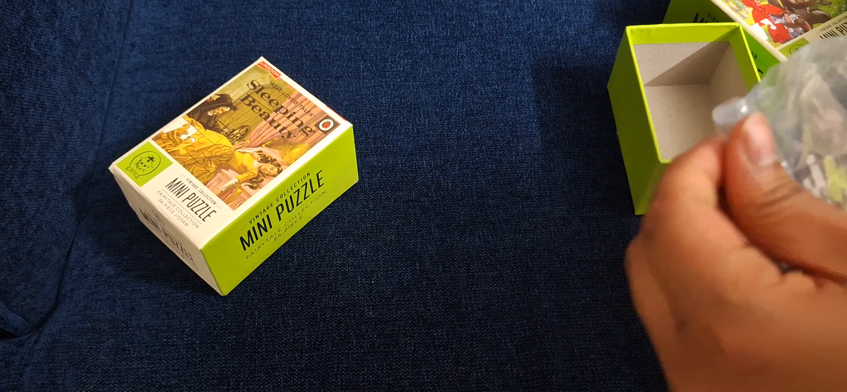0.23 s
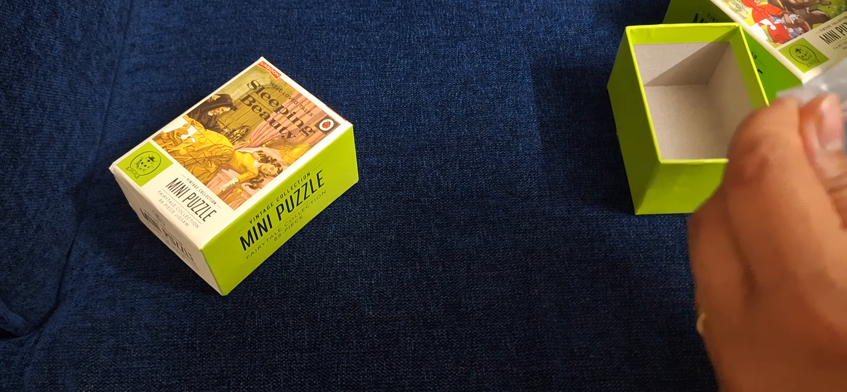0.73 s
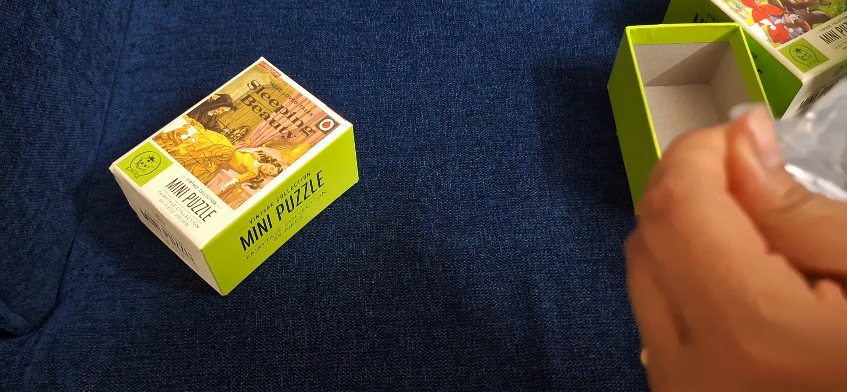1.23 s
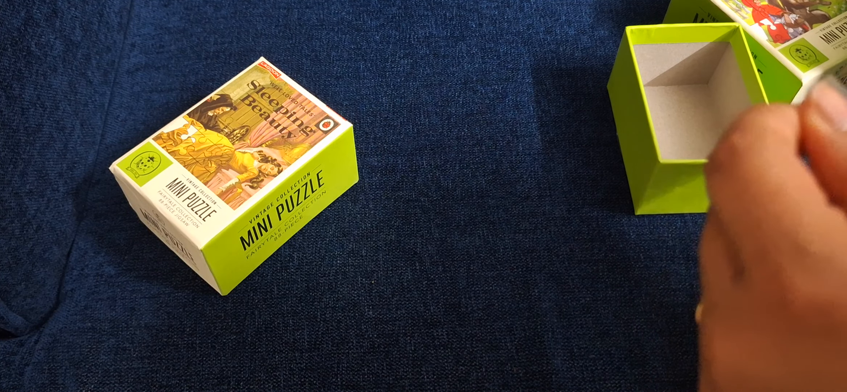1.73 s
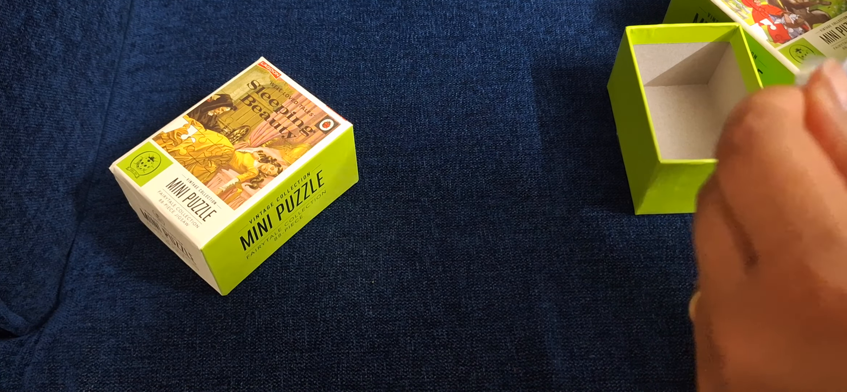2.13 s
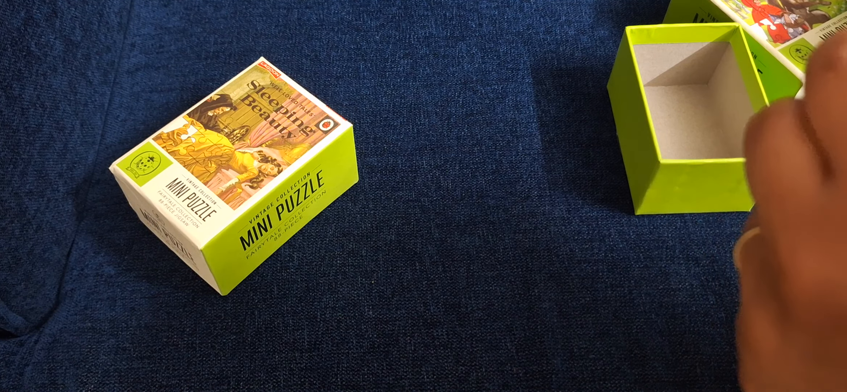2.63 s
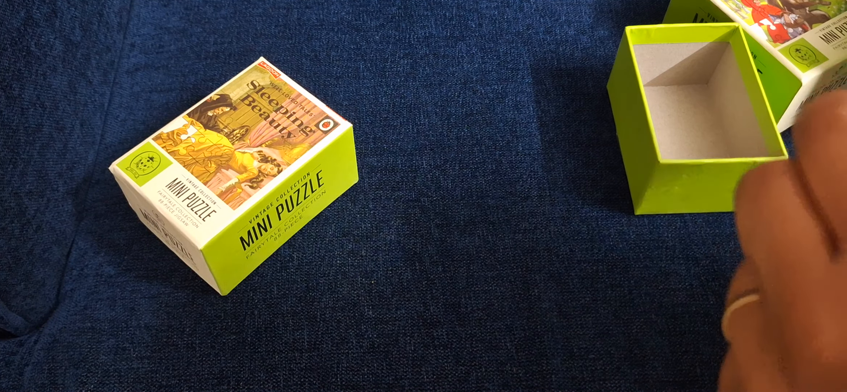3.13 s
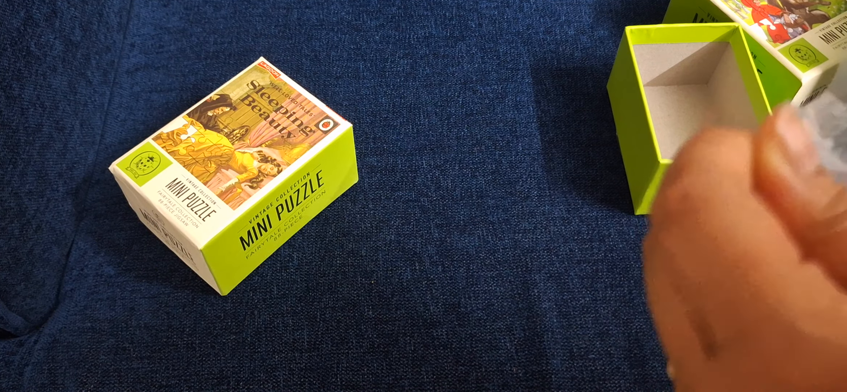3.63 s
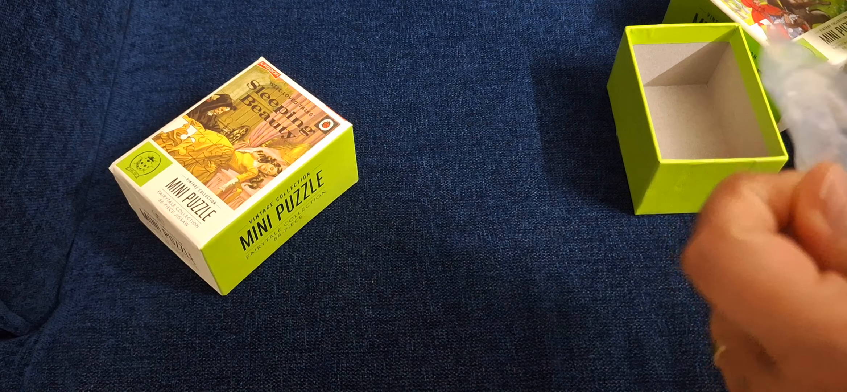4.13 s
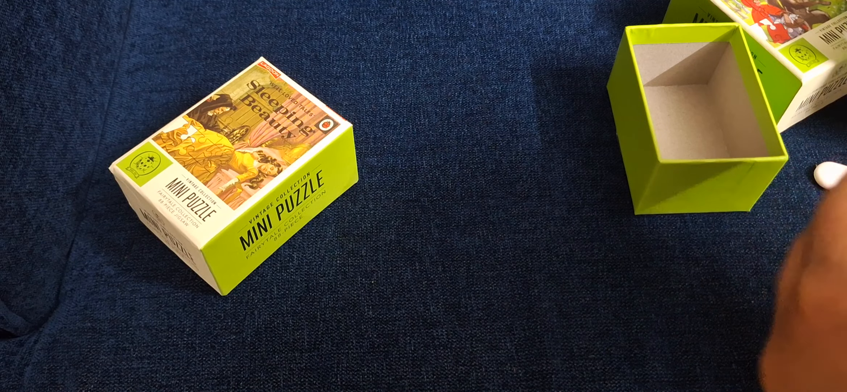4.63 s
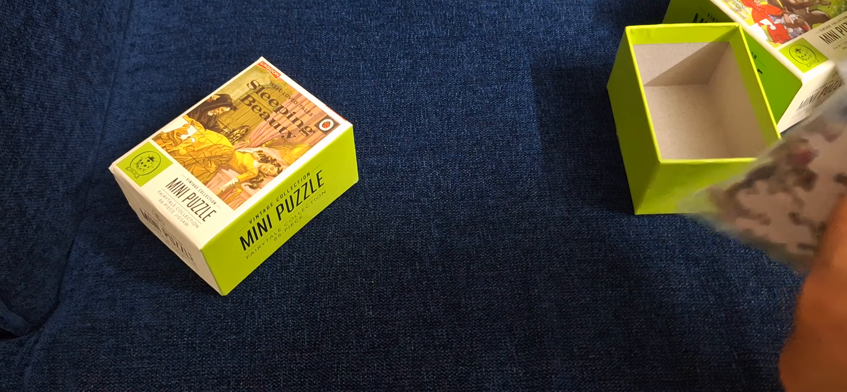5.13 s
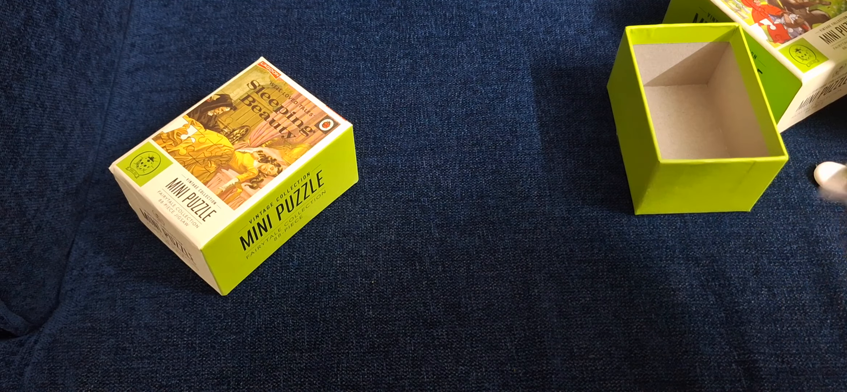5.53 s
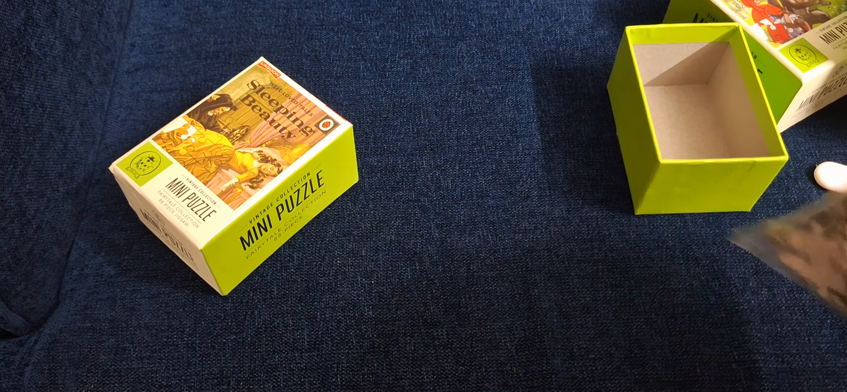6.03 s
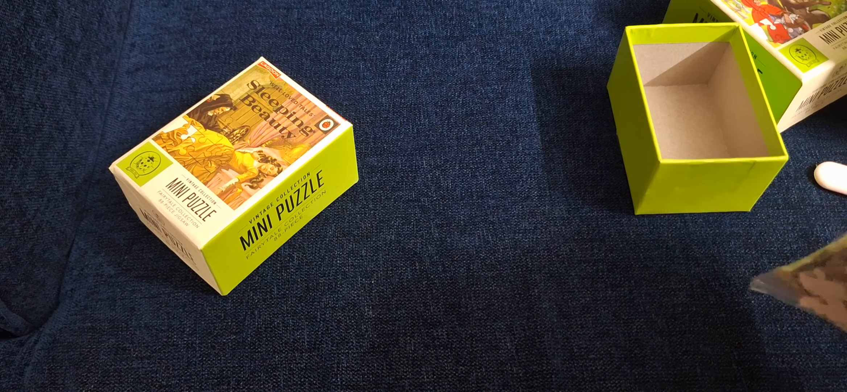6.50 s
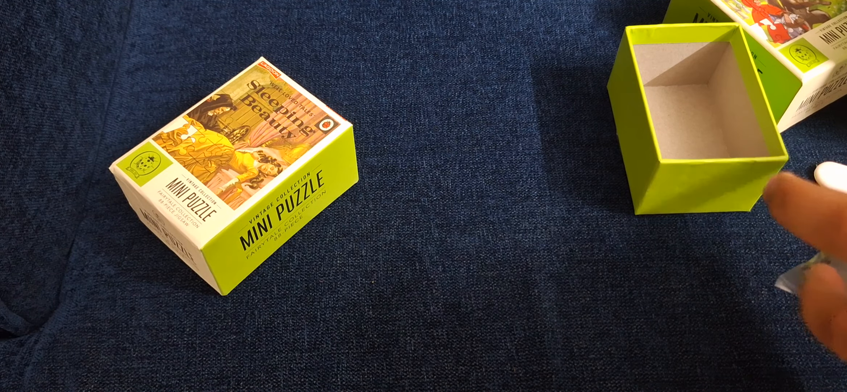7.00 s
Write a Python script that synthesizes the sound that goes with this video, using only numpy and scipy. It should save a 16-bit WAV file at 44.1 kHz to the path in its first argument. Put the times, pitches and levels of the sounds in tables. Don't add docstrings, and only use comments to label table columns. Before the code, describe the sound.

A small plastic bag of cardboard pieces is handled very close to a stereo phone in a small furnished room. It starts quietly, with faint ticks over a low, steady appliance hum. From 0.7 to 1.4 s sharp dry snaps and dense rustle build up, ending in a short smooth hissing slide around 1.5 s. A tight bright cluster cracks at about 1.9 s, then sparse ticks and another burst near 2.6 s. The loudest moment comes at 3.1 to 3.3 s: hard crackling with a low thump and hollow knock. From 3.4 to 4.1 s it is nearly silent. Crackle returns at 4.4 s, strengthens at 5.1 s and peaks around 5.45 s with card ticks and a knock. Until 6.8 s the shaking is looser and duller, thinning out; one last crinkle comes near 7.15 s. The bag moves from slightly right towards left; reverb is short and soft.

```python
import sys
import numpy as np
from scipy import signal
from scipy.fft import rfft, irfft, next_fast_len
from scipy.io import wavfile
from scipy.ndimage import uniform_filter1d

SR = 44100
rng = np.random.default_rng(int(sys.argv[2]) if len(sys.argv) > 2 else 0)


def int16_out(signal):
    q = np.round(np.clip(np.atleast_2d(signal).T, -1, 1) * 32767)
    wavfile.write(sys.argv[1], SR, q.astype(np.int16))


def how_loud(loudness_db):
    steps = np.asarray(loudness_db, float) / 20
    return 10 ** steps


N = 320166
T = np.arange(N) / SR
PORT_LAG, BASS_LAG, SLIDE_LAG = 8, 14, 15

# t/s, level/dB
HUM_LEVEL = [(0.0, -64.5), (1.05, -59.5), (4.14, -65), (4.65, -60), (7.26, -62.5)]
# f/Hz, level/dB
AIR_SPECTRUM = [(15, -44), (25, -25.5), (90, -9.5), (124, -12), (150, -15.5), (296, -25.5), (330, -21.5),
                (809, -36.5), (927, -48.5), (7710, -47.5), (16500, -53.5)]
# f/Hz, level/dB
FILM_SPECTRUM = [(88, -35), (150, -7.5), (583, -10.5), (1230, -12), (1500, -11.5), (4690, -17),
                 (6810, -19.5), (15000, -27), (16500, -33.5)]
# t/s, left minus right level/dB
BAG_PAN = [(0.0, -3.5), (1.4, -5), (2.6, -3), (3.3, -3), (3.78, -0.5), (4.8, -3), (5.4, -.5), (6.2, 1),
           (6.7, 4), (7.26, 3)]
# full grip t/s, held t/s, effort level/dB, brightness/dB (bare film above 0, card below)
HAND_MOVES = [(0.038, 0.026, -57, -0.5), (0.13, 0.081, -64, -1), (0.693, 0.022, -47, -0.5),
              (0.8, 0.12, -59, 0), (0.989, 0.17, -43, -1), (1.329, 0.05, -49, -0.5), (1.409, 0.1, -41.5, 2),
              (1.773, 0.08, -52, -5.5), (2.05, 0.0049, -56, 2.5), (2.24, 0.0056, -75, 0),
              (2.411, 0.065, -62, -0.5), (2.561, 0.092, -56.5, 1.5), (2.84, 0.0092, -54, 0),
              (3.019, 0.12, -68, -0.5), (3.195, 0.052, -34, 2), (3.72, 0.12, -80, 11.5),
              (4.059, 0.0307, -63.5, 2), (4.131, 0.043, -50.5, -1), (4.272, 0.088, -69, -1.5),
              (4.429, 0.034, -42.5, 0.5), (4.55, 0.3, -54.5, 0), (5.045, 0.07, -43, 2),
              (5.169, 0.11, -54.5, 1), (5.428, 0.051, -36.5, 0.5), (5.58, 0.27, -56, 0),
              (5.93, 0.28, -53, -0.5), (6.26, 0.025, -56.5, 0.5), (6.363, 0.025, -48.5, 1.5),
              (6.604, 0.082, -57, 0.5), (6.761, 0.094, -68, -3.5), (7.165, 0.017, -53.5, 0)]

# t/s, peak level/dB, film ring f/Hz, fizz level/dB
PICKING_SNAPS = [(0.0321, -39, 7660, -34), (0.1669, -39, 5130, -3), (0.2148, -37.5, 7500, 5),
                 (0.4294, -37, 4870, -34), (0.6695, -39, 1700, -22), (0.6773, -39, 6600, 4),
                 (0.7518, -15.5, 5050, -7.5), (0.8144, -22.5, 6240, -1), (0.8689, -23.5, 6500, -19),
                 (0.958, -23, 5040, -19.5), (0.9932, -23.5, 3150, -1), (1.022, -21.5, 1210, -7.5),
                 (1.0645, -17, 5130, 1), (1.0924, -28, 3120, 8), (1.1577, -16, 5270, -14),
                 (1.3222, -28.5, 2350, -12), (1.8394, -24, 4300, -34), (1.8589, -22, 5300, -10),
                 (1.8777, -17, 3150, -10.5), (1.8978, -10, 5320, -7.5), (2.1395, -36, 4560, -26),
                 (2.328, -45, 2980, -33), (2.4388, -33.5, 3050, -47), (2.4771, -34.5, 4830, -25),
                 (2.5494, -28, 4370, -19), (2.5571, -31, 4030, -10.5), (2.5733, -31, 1290, 0),
                 (2.5854, -15.5, 4570, 3), (2.6602, -29, 2195, -1.5)]
# t/s, peak level/dB, film ring f/Hz, fizz level/dB
TEARING_SNAPS = [(2.805, -32.5, 4650, -14), (2.838, -30.5, 6900, -11), (3.0823, -33, 2770, -3),
                 (3.1134, -28, 2900, -7), (3.1313, -16, 3640, -10), (3.1413, -15.5, 6000, -1.5),
                 (3.185, -16, 5700, -0.5), (3.237, -9.5, 2020, -9), (3.294, -9.5, 2196, -6.5),
                 (3.3723, -31.5, 1340, -6), (3.603, -44.5, 2170, -34), (3.7104, -53, 8100, 18),
                 (4.1298, -29.5, 3860, -32), (4.1495, -37, 3530, -19), (4.224, -32.5, 8150, 1),
                 (4.5246, -32, 4200, -14), (4.536, -35, 3140, -2), (4.561, -23.5, 2900, -8.5),
                 (4.5952, -20.5, 3180, -9.5), (4.632, -28.5, 8000, -30), (4.661, -32.5, 3120, -9),
                 (4.8018, -31.5, 5740, -30), (4.8204, -23.5, 2330, -2), (4.9633, -34.5, 1430, -22),
                 (4.9852, -29.5, 6250, 5), (5.0693, -19.5, 6370, -5), (5.1002, -14.5, 6860, -3.5)]
# t/s, peak level/dB, film ring f/Hz, fizz level/dB
SHAKING_SNAPS = [(5.2418, -46, 4100, -24), (5.256, -25, 5340, -7), (5.3365, -35.5, 3800, -28),
                 (5.3943, -30, 6000, -5), (5.412, -35, 5170, 7), (5.4453, -26.5, 1190, 6),
                 (5.53, -23.5, 6000, -4), (5.5894, -30.5, 6800, -14), (5.65, -23.5, 7600, -7.5),
                 (5.7409, -34.5, 1870, -22), (5.7711, -28, 1670, -11), (5.808, -28.5, 2030, -30),
                 (5.8234, -23.5, 1630, -21), (5.9417, -25.5, 2490, -24), (6.0025, -57, 1620, -18),
                 (6.02, -45, 3150, -15), (6.0519, -27.5, 1050, -5.5), (6.152, -25.5, 6760, -21),
                 (6.231, -27, 2204, -4.5), (6.3664, -28, 1840, -11), (6.659, -29, 1860, -30),
                 (6.8033, -37, 1510, -36), (7.128, -54, 2990, -31), (7.155, -23.5, 2700, -10)]
# t/s, peak level/dB, film ring
# f/Hz, fizz level/dB
FURTHER_SNAPS = [(0.1139, -49.5, 1130, 8), (1.8442, -27, 4200, -4), (3.0805, -44, 1500, -11),
                 (3.1845, -22.5, 1990, -13), (3.2635, -17, 1250, -4.5), (3.31, -20.5, 3070, -25.5),
                 (3.7098, -42, 4200, 15), (3.7793, -55.5, 3820, -6), (3.8683, -60.5, 8400, -12.5),
                 (4.4162, -36, 7130, -11), (4.4458, -21, 4600, -16), (5.0578, -32, 2050, -21.5),
                 (6.61, -34, 3200, 1), (6.617, -38, 8200, 4),
                 (0.954, -33, 4000, -25), (1.0446, -23.5, 3480, -10), (1.142, -37, 2480, -13),
                  (1.18, -29, 3500, -25), (1.788, -33, 3500, -17), (4.409, -43, 6000, -17),
                  (4.476, -24.5, 2460, -21), (4.5268, -32, 4830, -12), (4.569, -33, 5500, -11),
                  (4.578, -38, 5440, -6), (4.758, -47, 1990, -7), (4.809, -35, 3500, -14),
                  (4.871, -39, 3000, -18), (5.005, -44, 4000, -7), (5.033, -39, 4000, -16),
                  (5.645, -46, 7500, 3), (5.673, -31, 7000, -14), (6.263, -34, 2400, -26),
                  (6.400, -31, 2000, -8), (6.579, -44, 2480, -18), (6.699, -46, 2000, -22),
                  (6.725, -60, 3000, -25), (3.808, -59, 7700, 2), (3.842, -57, 7560, 0),
                  (3.243, -30, 2480, 3), (1.8955, -24, 5500, -8)]
# t/s, peak level/dB, ring f/Hz
SMALL_TICKS = [(0.057, -48, 6600), (0.3336, -48, 1770), (0.6905, -22.5, 2700), (0.6992, -20, 5960),
               (0.8263, -35.5, 1775), (1.031, -22.5, 5100), (1.049, -24, 5030), (1.1242, -24, 5900),
               (1.1928, -35, 4450), (1.2081, -28, 3260), (1.2442, -35, 2930), (1.263, -34.5, 1580),
               (1.378, -36, 1910), (1.3898, -28, 1880), (1.5836, -33, 4500), (1.7317, -42, 1490),
               (1.793, -29, 5880), (2.4279, -36.5, 1285), (2.5955, -18, 3130), (2.613, -27.5, 3000),
               (3.0119, -36, 3000), (3.0334, -37.5, 1636), (3.149, -16.5, 1950), (3.1973, -21.5, 1960),
               (3.2602, -14, 1920), (3.806, -48.5, 4070), (3.8392, -57, 4370), (4.041, -45, 1940),
               (4.4124, -32, 4100), (4.4566, -22.5, 6950),
               (4.4916, -26, 4540), (4.6891, -26.5, 2700), (4.734, -35, 6200), (5.0413, -28, 5070),
              (5.056, -23.5, 2080), (5.1211, -27, 5960), (5.144, -26, 4120), (5.1534, -29, 5630),
              (5.2606, -42, 5700), (5.302, -36, 2800), (5.423, -23, 7440), (5.4343, -21.5, 4600),
              (5.4682, -25, 5170), (5.478, -19, 4370), (5.5426, -23, 3400), (5.594, -28, 2300),
              (5.6776, -26, 7000), (6.089, -34, 1670), (6.329, -32.5, 1570), (6.3444, -34, 1390),
              (6.375, -31.5, 1740), (6.3871, -27.5, 1940), (6.435, -36, 2850), (6.4542, -35, 2130),
              (6.5836, -32.5, 2960), (6.614, -27.5, 3320), (6.767, -44, 2450), (6.832, -33, 1760),
              (6.8578, -43, 3130), (6.9099, -43.5, 1610),
               (0.711, -30, 4700), (1.0967, -17, 3180), (1.282, -37, 2220), (1.651, -51, 8000),
                  (1.766, -41, 1760), (2.1613, -46, 1990), (2.389, -43.5, 6200), (2.528, -41, 1480),
                  (2.826, -39.5, 1410), (2.857, -39, 2080), (2.945, -50, 1990), (2.963, -59.5, 2930),
                  (3.0235, -39, 2000), (3.739, -48, 4120), (3.78, -55, 7660), (3.973, -59, 7630),
                  (4.309, -42.5, 1460), (4.3473, -48, 3900), (4.779, -43.5, 1300), (4.864, -33, 2200),
                  (5.2226, -32, 5000), (5.92, -39, 1700), (5.9548, -37, 1630), (6.1983, -36, 2700),
                  (6.313, -37, 1160), (6.52, -43, 1800), (6.7084, -41, 1760),
               (0.0852, -42, 1280), (0.1229, -44, 1250), (0.6272, -53, 1750), (0.9866, -24, 3070),
               (1.2037, -26.5, 1500), (1.2161, -28.5, 1540), (1.3222, -51, 1770), (1.3993, -33, 1270),
               (1.6726, -51.5, 1220), (1.7989, -37, 5060), (1.8027, -39.5, 1660), (1.8553, -31, 5070),
               (1.874, -21, 4730), (2.0402, -42.5, 1380), (2.0496, -43, 5130), (2.239, -46, 1240),
               (2.5619, -28, 2034), (2.8426, -27.5, 2420), (2.9864, -50, 1320), (2.9922, -46, 1450),
               (3.0006, -69.5, 3930), (3.0055, -51.5, 2100), (3.3723, -29.5, 1500), (3.49, -53, 4990),
               (4.1496, -23, 3630), (4.2154, -41.5, 1250), (4.5362, -47, 3200), (4.6015, -26.5, 6500),
               (4.6506, -37, 6310), (4.6833, -28.5, 5630), (4.7075, -31, 2500), (4.8777, -42.5, 2410),
               (4.8817, -45, 6400), (5.0835, -37, 3130), (5.1003, -63, 7500), (5.2317, -46, 5370),
               (5.2424, -37, 4100), (5.2603, -20, 5600), (5.2992, -37, 3960), (5.303, -32, 3130),
               (5.3137, -44, 2020), (5.4332, -23.5, 7600), (5.474, -20.5, 5070), (5.4884, -24, 5140),
               (5.7324, -30, 1990), (5.8573, -38, 1180), (5.9633, -32.5, 1830), (5.9836, -43, 2630),
               (6.0032, -32, 1630), (6.3796, -28, 1710), (6.4556, -37.5, 5240), (6.5548, -51, 1960),
               (6.6082, -38, 3080), (6.6441, -39, 1660), (6.731, -38, 1440), (6.8039, -33.5, 1690)]

# t/s, peak level/dB, f/Hz
CLOTH_THUMPS = [(0.125, -48, 75.6), (1.425, -42, 90), (3.185, -37.5, 66), (3.233, -41.5, 86),
                (4.036, -47.5, 94.2), (4.145, -38, 111), (5.817, -48, 103), (5.962, -47, 101),
                (6.594, -51, 67.3)]
# t/s, peak level/dB, f/Hz
KNOCKS = [(.038, -48.5, 253), (.1, -51, 400), (1.475, -39, 286), (1.51, -41, 220),
          (1.843, -39, 418), (3.257, -27, 457), (5.474, -28, 565), (1.154, -37.5, 272),
          (1.261, -36, 415), (2.044, -41, 230), (2.423, -45, 283), (2.608, -33.5, 463),
          (3.601, -51.5, 323), (4.149, -35.5, 120.2), (5.818, -34.5, 317), (6.655, -42.5, 190),
          (7.172, -42.5, 130.6),
          (0.7114, -44, 320), (0.986, -36.5, 448), (1.0346, -28.5, 606), (1.0468, -31.5, 477),
                (1.0956, -28, 800), (1.1908, -30.5, 470), (1.8541, -33, 470), (2.0736, -40.5, 450),
                (2.1624, -47.5, 425), (2.4491, -46, 430), (2.5853, -40, 350), (2.6742, -47, 510),
                (2.9848, -46, 490), (3.1308, -42.5, 486), (3.1845, -38.5, 480), (3.2931, -25, 495),
                (3.3697, -55, 730), (4.1282, -36.5, 450), (4.7067, -47, 462), (4.7362, -44, 590),
                (6.1399, -42, 780), (6.2288, -48, 685), (6.3424, -34.5, 820)]


def unit(x):
    return x / np.sqrt(np.mean(x ** 2))


def band(x, lo_hz, hi_hz, order=2):
    edges = [lo_hz, min(hi_hz, 0.45 * SR)]
    return signal.sosfilt(signal.butter(order, edges, "bandpass", fs=SR, output="sos"), x)


def colour(x, points):
    hz, db = np.transpose(points)
    size = next_fast_len(N)
    f = np.arange(size // 2 + 1) * SR / size + 1
    gain = how_loud(np.interp(np.log(f), np.log(hz), db))
    return irfft(rfft(x, size) * gain, size)[..., :N]


def ports(near, other, pan_db, alike, lag=PORT_LAG):
    alike = np.clip(alike, 0, 1)
    left = alike * np.roll(near, lag) + np.sqrt(1 - alike ** 2) * other
    return np.array([left * how_loud(pan_db / 2), near * how_loud(-pan_db / 2)])


def heard(part, db, pan_db, alike, lag=PORT_LAG):
    near, other, around = part / np.abs(part).max(axis=1, keepdims=True)
    pair = ports(near, other, pan_db, alike, lag)
    peak = np.sqrt(np.mean(np.abs(pair).max(axis=1) ** 2))
    return how_loud(db) * np.vstack([pair / peak, around])


def add(out, x, s):
    i = int(s * SR)
    out[:, i:i + x.shape[1]] += x[:, :N - i]


def appliance():
    duck = how_loud(np.interp(T, *np.transpose(HUM_LEVEL)))
    noise = rng.standard_normal((5, N))
    hum = np.sqrt(2) * np.sin(2 * np.pi * 100.3 * T) + 0.58 * unit(band(noise[0], 95.7, 108))
    drone = unit(band(noise[1], 55, 75)) + 0.62 * unit(band(noise[2:4], 58, 97))
    bass = band(noise[4], 27, 560, order=1)
    air = colour(noise[2:4] + 4.4 * bass, AIR_SPECTRUM)
    return duck * (hum + drone) * how_loud([[-0.5], [0.5]]) + how_loud(-66.5) * unit(air)


def effort():
    grab_db_s, let_go_db_s, rest_db = 739, 208, -74.5
    s, held, db, bright_db = np.transpose(HAND_MOVES)[:, :, None]
    t = T[::64]
    ramp = grab_db_s * np.maximum(s - t, 0) + let_go_db_s * np.maximum(t - s - np.abs(held), 0)
    power = how_loud(2 * (db - ramp))
    total = power.sum(axis=0) + how_loud(2 * rest_db)
    bright = (power * bright_db).sum(axis=0) / total
    return np.interp(T, t, 10 * np.log10(total)), np.interp(T, t, bright)


def crackle(rate, spread_db, ring_s):
    hit, size = rng.random(N), rng.exponential(size=N)
    slips = (hit < rate / SR) * how_loud(spread_db * np.minimum(size, 2.6))
    puff = signal.lfilter([1], [1, -np.exp(-1 / (ring_s * SR))], slips ** 2) ** 0.5
    return unit(puff * rng.standard_normal((2, N)))


def rustle():
    film_db, bright_db = effort()
    card_db = -57.5 + 0.58 * (film_db + 56) - bright_db
    sheen_db = -63 + 0.88 * (film_db + 54) + 2.3 * bright_db
    edge_db = card_db - 1.5 + 0.2 * np.minimum(film_db + 63.5, 0)
    pan_db = np.interp(T, *np.transpose(BAG_PAN))

    slide = uniform_filter1d(1.0 * (T > 1.4) * (T < 1.58), size=2048)
    edge_db = edge_db - 6 * slide
    grip = (1 - 0.75 * slide) * np.clip((film_db + 82) / 16, 0.2, 1)
    patches = sum(unit(band(crackle(90, 3.5, 0.001), hz / 1.25, hz * 1.25))
                  for hz in (1900, 3000, 4800, 7400))
    fine = crackle(3000, 2.5, 0.0006)
    coarse = unit(patches) + 0.6 * unit(band(crackle(120, 3.5, 0.0008), 300, 7000))
    slips = colour(grip * coarse + (1.48 - grip) * fine, FILM_SPECTRUM)
    card = colour(grip * crackle(220, 3.2, 0.002), FILM_SPECTRUM) + 0.6 * slips

    skin = unit(band(slips, 1400, 11000, order=3))
    film = np.sqrt(1 - slide) * ports(*skin, pan_db, 0.51)
    film += np.sqrt(slide) * ports(*skin, pan_db, 0.55, SLIDE_LAG)
    film *= how_loud(film_db)
    glitter = unit(band(fine + grip * crackle(260, 2.6, 0.0011), 9000, 24000, order=3))
    sheen = how_loud(sheen_db) * ports(*glitter, pan_db - 8.5, 0.18)
    scrape = how_loud(card_db) * ports(*unit(band(card, 200, 964)), pan_db + 0.5, 0.86, BASS_LAG)
    scrape += how_loud(edge_db) * ports(*unit(band(card, 740, 1880)), pan_db + 0.11, 0.8, 11)

    rumble = unit(band(crackle(1800, 2.1, 0.0013), 150, 460))
    drag = how_loud(-50.5) * slide * ports(*rumble, pan_db + 3, 0.81, SLIDE_LAG)
    seam_hz = 5280
    seam = unit(band(fine, seam_hz / 1.2, seam_hz * 0.98))
    drag += how_loud(-56.5) * slide * ports(*seam, pan_db, 0.55, SLIDE_LAG)
    return film + sheen + scrape + drag


def room(x):
    t60_s, fast_t60_s, gap_s = 0.23, 0.1, 0.0053
    t = T[:SR // 2]
    tail = rng.standard_normal((2, len(t))) * how_loud(-60 * t / t60_s) * (t > gap_s)
    tail = band(tail, 95, 9400) + 0.93 * tail * how_loud(-60 * t / fast_t60_s)
    tail /= np.sqrt(np.sum(tail ** 2, axis=1, keepdims=True))
    tail = ports(*tail, -3, 0.4)
    return how_loud(-6) * signal.fftconvolve(x[None], tail, axes=1)[:, :N]


def snaps():
    out, t = np.zeros((3, N)), T[:768]
    fizz_base_db, fizz_db_per_octave = -32, 13
    ticks = [(s, db, hz, fizz_base_db + fizz_db_per_octave * np.log2(hz / 1500))
             for s, db, hz in SMALL_TICKS]
    rows = PICKING_SNAPS + TEARING_SNAPS + SHAKING_SNAPS + ticks + FURTHER_SNAPS

    chance = rng.standard_normal((len(rows), 5, 3, len(t)))
    chance[:, :, 2] = t == 0
    chance[:, 1:3, :2, 10] += 6
    settle = uniform_filter1d(1.0 * (chance[:, 4, :1] > 2.7), size=24) * 24
    onset = 1 - np.exp(-(t + 1 / SR) / 0.0004)
    flips = onset * (np.exp(-t / 0.001) + (0.045 + 0.25 * settle) * np.exp(-t / 0.006))
    fizzes = band(chance[:, 2] * flips, 6500, 16400)

    boom_hz = 690 * 2 ** (0.75 * np.clip(chance[:, 4, 1, 0], -1, 1))
    pushes = chance[:, 3] * np.exp(-t / 0.003)
    wides = band(pushes, 380, 2000)
    booms = [band(push, hz / 0.77, hz * 2.65, order=1) + 2.1 * wide
             for push, hz, wide in zip(pushes, boom_hz, wides)]

    for (s, db, hz, fizz_db), c, flip, fizz, boom in zip(rows, chance, flips, fizzes, booms):
        boom_db = -10 + 2.5 * np.log2(hz / 1500)
        boom_db -= 0.5 * max(fizz_db - fizz_base_db, 0) * (hz > 2200)
        boom_db += 0.83 * min(db + 32, 0)
        pan_db = np.interp(s, *np.transpose(BAG_PAN))
        film = 4.06 * band(c[0] * flip, hz * 0.86, hz * 1.12, order=1)
        film += band(c[1] * flip, 900 + 0.057 * hz, 2300 + 1.1 * hz)
        sound = heard(film, db + 1, pan_db, 0.38 + 0.28 * (hz < 2500))
        sound += heard(boom, db + boom_db + 4.5, pan_db - 1.5, 0.85, BASS_LAG)
        sound += heard(fizz, db + fizz_db + 5.5, pan_db - 21, 0.14)
        sound[2] *= how_loud(-0.2 * (db + 38))
        add(out, sound, s)
    return out


def thumps():
    out, t = np.zeros((2, N)), T[:8192]
    for s, db, hz in CLOTH_THUMPS + KNOCKS:
        envelope = (1 - np.exp(-t * hz / 0.29)) * how_loud(-60 * t * hz / 7)
        blow = np.sin(2 * np.pi * hz * t) * envelope
        add(out, how_loud(db) * ports(blow, blow, -6, 0.98, BASS_LAG) / np.abs(blow).max(), s)
    return out


def scene():
    background, soft, sharp = appliance(), rustle(), snaps()
    answer = room(sharp[2] + 0.52 * soft[1])
    return background + soft + answer + sharp[:2] + thumps()


def low_pass(x):
    return signal.sosfilt(signal.butter(12, 17150, fs=SR, output="sos"), x)


def record(dry):
    port_hz, port_width_hz, top_hz, click_top_hz = 7640, 710, 15750, 16600
    rung = dry + band(dry, port_hz - port_width_hz / 2, port_hz + port_width_hz / 2, order=1)
    cut, wide = (signal.sosfilt(signal.ellip(10, 0.5, 80, hz, fs=SR, output="sos"), rung)
                 for hz in (top_hz, click_top_hz))
    top = band(wide, top_hz + 150, click_top_hz, order=4)
    power = np.sum(top ** 2, axis=0)
    click = uniform_filter1d(power, size=128) > 6 * uniform_filter1d(power, size=2048)
    gate = np.minimum(3 * uniform_filter1d(1.0 * click, size=256), 1)
    return low_pass(cut + how_loud(-11) * top * gate)


dry = scene()
out = record(dry)
int16_out(out)
```